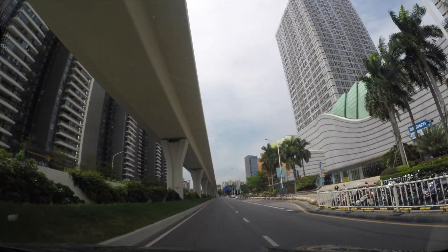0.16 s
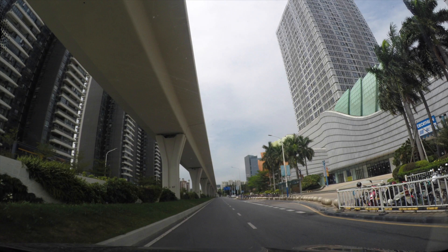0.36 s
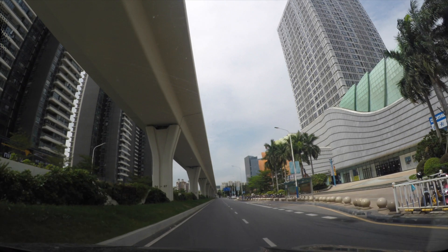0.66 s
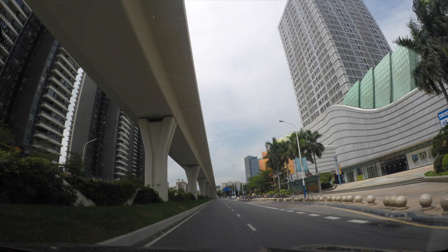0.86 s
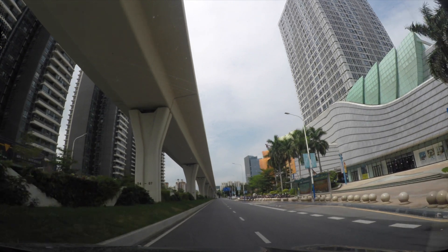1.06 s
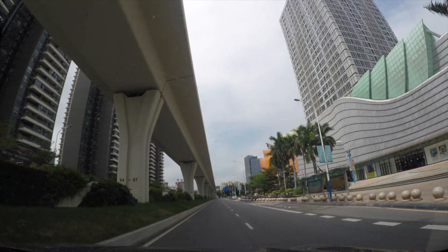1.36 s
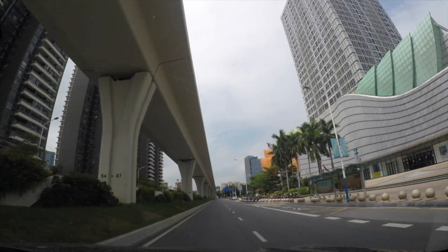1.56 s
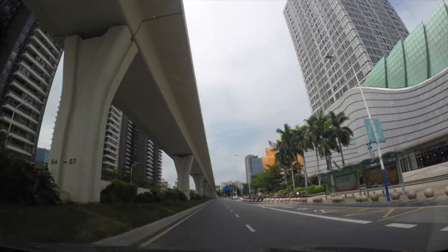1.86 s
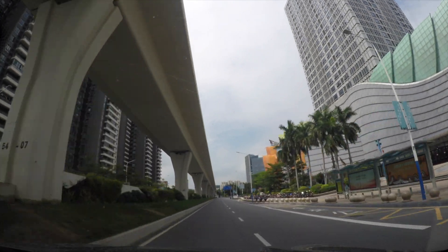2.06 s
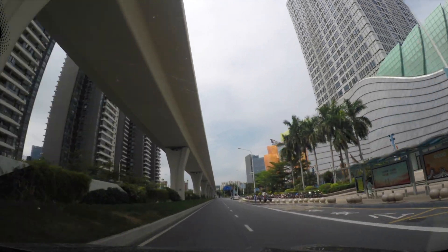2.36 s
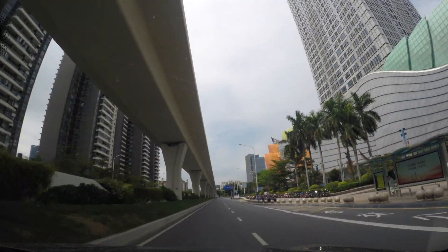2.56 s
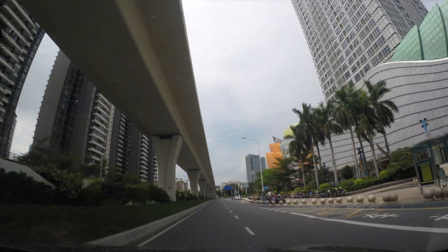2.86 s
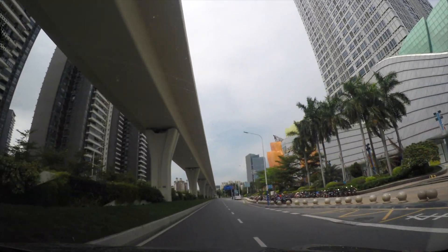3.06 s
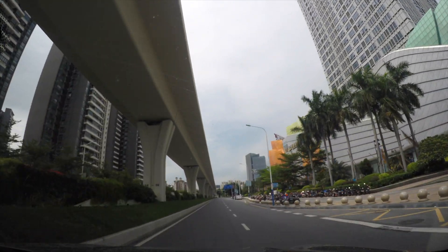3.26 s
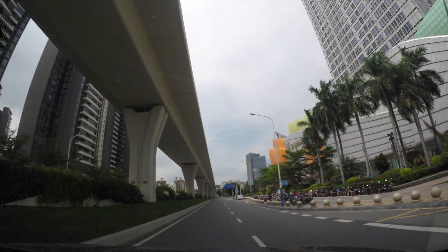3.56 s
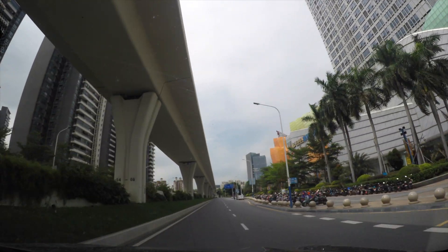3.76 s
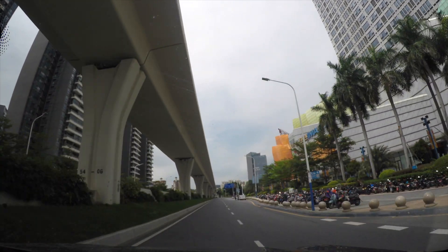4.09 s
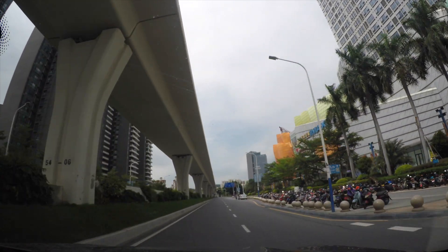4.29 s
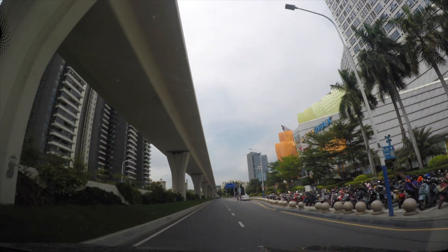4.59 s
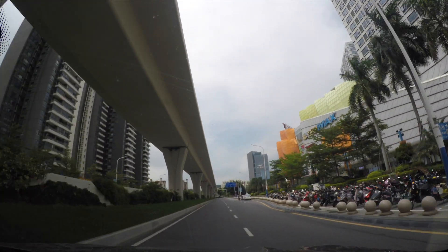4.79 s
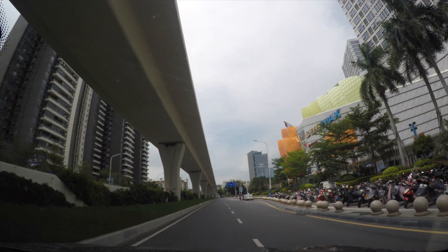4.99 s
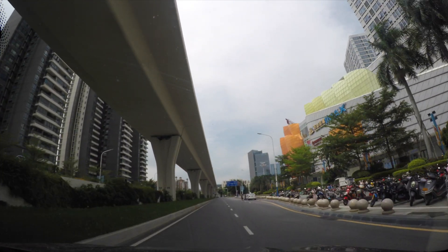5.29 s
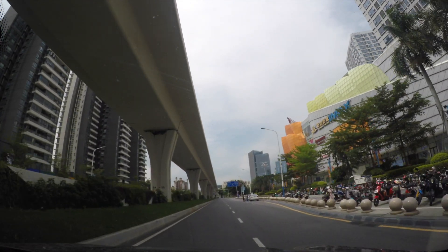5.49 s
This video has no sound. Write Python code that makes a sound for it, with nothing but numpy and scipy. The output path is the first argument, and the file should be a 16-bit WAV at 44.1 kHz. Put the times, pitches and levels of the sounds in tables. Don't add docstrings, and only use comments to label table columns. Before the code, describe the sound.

Steady bass-heavy car cabin drone on a city road, engine hum swelling and dropping in pitch after an upshift, bumps thudding softly underneath.

```python
import sys
import numpy as np
from scipy import signal
from scipy.io import wavfile
from scipy.ndimage import uniform_filter1d

SR = 44100
rng = np.random.default_rng(int(sys.argv[2]) if len(sys.argv) > 2 else 0)


def boost_factor(decibels):
    exponent = np.asarray(decibels, float) / 20
    return 10 ** exponent


def file_out(sig):
    cols = np.atleast_2d(sig).T
    lim = np.clip(cols, -1, 1)
    pcm = np.round(lim * 32767).astype(np.int16)
    wavfile.write(sys.argv[1], SR, pcm)


N = 248397

# time_s, firing_hz
ENGINE_SPEED = [
    [(0, 54), (.45, 60.24), (.8, 60.52), (1.35, 62.56), (2.1, 59)],
    [(2.25, 50.03), (2.66, 53.87), (2.9, 49.13), (3.4, 47.96), (4.15, 47.31), (4.5, 51.5), (4.87, 48.93),
     (5.63, 47.03)],
]
# start_s, press_s, held_s, firing_level_db, sag_db_per_s
THROTTLE_PRESSES = [
    (.33, .27, 1.18, -20.5, -0.7),
    (2.479, 0.4, 1.09, -16.5, -7.5),
    (4.18, 0.31, 0.8, -15.5, -6.5),
    (5.37, .25, .4, -17, 6),
]
# multiple_of_firing_rate, level_db (against the second order)
UPPER_ORDERS = [(3, -15), (4, -19)]
# time_s, level_db (against the average)
ROAD_COARSENESS = [
    (0, -0.5),
    (.4, -0.6),
    (.8, 0.5),
    (1.4, 0.5),
    (1.8, -0.46),
    (2.8, -0.4),
    (3.6, -0.84),
    (4.6, -0.5),
    (5.2, -.7),
    (5.63, -1),
]
# pitch_hz, level_db_per_hz
RUMBLE_COLOUR = [(7.1, -38.5), (12, -18), (32, -3.5), (53, -1), (69, -5.5), (87, -6.5), (129, -8.5),
                 (185, -12.5), (227, -15.5), (320, -31.5), (420, -59), (700, -120)]
# pitch_hz, level_db_per_hz
ROAR_COLOUR = [(140, -23), (240, -3.5), (266, -3.5), (442, -7), (495, -11), (813, -21), (1050, -26),
               (1550, -31), (1900, -34), (5000, -45.5), (6500, -71.5), (11000, -120)]
# pitch_hz, width_hz, lift_db
PANEL_MODES = [(81, 16, 6), (99, 9.3, 4.5), (122.2, 24, 6), (147, 12, -2), (198.1, 9, 7.5), (229, 16, 6),
               (245, 5, -3), (344.7, 44, 1), (445.4, 42, 5), (495, 2, -9), (542.6, 11, 7), (610, 18, 0),
               (839, 150, 5), (1300, 55, -1.5), (1411, 70, 3.5), (1560, 130, 4.5), (2256, 70, 4.5),
               (3600, 560, -0.5), (5420, 80, 4)]
# pitch_hz, level_db_per_hz
HISS_COLOUR = [(1800, -28), (3000, -5), (3600, -1.5), (4200, -12.5), (5400, -5), (8000, -9), (11300, -11.5),
               (13800, -14.5), (15500, -17)]
# pitch_hz, level_db
WHINE_TONES = [(11127, -97), (14692, -90)]
# time_s, boom_level_db, boom_pitch_hz, wheel_hop_level_db
ROAD_BUMPS = [(.13, -16.5, 35.5, -23), (.33, -27, 39.3, -29), (.5, -18.5, 36.3, -32),
              (.73, -15.5, 35.6, -39), (.97, -26, 37.5, -32), (1.18, -18, 37, -33), (1.42, -23, 36, -34),
              (1.62, -20.5, 37.9, -27.5), (1.95, -18, 38, -30), (2.14, -26, 42, -29.5),
              (2.35, -22.5, 42.3, -36), (2.62, -21, 37.8, -23.5), (2.91, -17.6, 37.4, -33),
              (3.2, -21, 37.9, -29), (3.42, -24.5, 36.6, -28.5), (3.85, -25.5, 38.5, -38),
              (4.01, -22, 38.2, -32.5), (4.2, -20.5, 38, -39), (4.5, -22.5, 38.4, -37),
              (4.71, -23, 36.8, -26.5), (5.12, -24, 35.8, -32), (5.36, -22, 38.8, -38),
              (5.6, -25, 38.5, -26.5)]
# start_s, peak_db, ring_hz, t60_s, snap_db (against the ring)
TRIM_TICKS = [
    (.341, -54, 3600, 0.011, -5),
    (.371, -64, 7270, 0.014, 0),
    (1.1589, -47.5, 2630, 0.011, -13),
    (1.161, -58, 6900, .01, -6),
    (1.914, -64, 6020, .01, -2),
    (2.107, -50, 4556, 0.013, -12),
    (2.108, -58, 6440, 0.016, -20),
]
# start_s, peak_db, ring_hz, t60_s, snap_db (against the ring)
HARD_PINGS = [
    (1.194, -65, 13950, .02, -23),
    (1.198, -61, 14020, 0.036, -15),
    (1.5374, -50.5, 13700, 0.011, -16),
    (1.54, -55.5, 14000, .08, -24),
]
# pitch_hz, step_db (against the usual level at 12 kHz)
SHORT_FRAME_STEPS = [(0, -40), (6000, -14), (9000, 1), (10500, 5.5), (12800, 7.5), (13000, 9.5),
                     (15000, 9.5)]
# pitch_hz, step_db (against the usual level at 12 kHz)
LONG_FRAME_STEPS = [(0, -40), (7000, -14), (10000, 2), (12800, 2.5), (13000, 3.5), (15000, 3.5)]
# pitch_hz, gain_db
CAMERA_BAND_EDGE = [(14900, 0), (15100, -8), (15500, -18), (15800, -60.5)]


def evened(x):
    return x / np.sqrt(np.mean(x ** 2) + 1e-20)


def curves(rows, t):
    s, *columns = np.transpose(rows)
    return [np.interp(t, s, column) for column in columns]


def drift(rate_hz):
    t = np.arange(0, N + 64, 64) / SR
    f = np.geomspace(rate_hz / 20, rate_hz, num=24)
    waves = np.sin(2 * np.pi * (f * t[:, None] + rng.random(len(f))))
    slow = (waves / np.sqrt(f)).sum(axis=1)
    return evened(np.interp(np.arange(N) / SR, t, slow))


def resonate(x, hz, width_hz):
    turn = np.exp(2j * np.pi * np.cumsum(hz * np.ones(len(x))) / SR)
    r = np.exp(-np.pi * width_hz / SR)
    return 2 * (turn * signal.lfilter([1 - r], [1, -r], x / turn)).real


def throttle(t, hz):
    lift_s, coast_db, coast_second_db = .28, -31, -48
    first = boost_factor(coast_db) + 0 * t
    for s, press_s, held_s, db, sag in THROTTLE_PRESSES:
        pressing = (t - s) / press_s
        lifting = 1 - (t - s - held_s) / lift_s
        load = np.clip(np.minimum(pressing, lifting), 0, 1) ** 2
        first = first + load * boost_factor(db + sag * (t - s - held_s / 2))
    second_db = -23 + 0.57 * (hz - 51)
    return first, boost_factor(coast_second_db) + first * boost_factor(second_db)


def engine():
    out = np.zeros(N)
    uneven = boost_factor(.6 * drift(14.))
    for rows in ENGINE_SPEED:
        span = slice(round(rows[0][0] * SR), min(round(rows[-1][0] * SR), N))
        t = np.arange(N)[span] / SR
        hz = curves(rows, t)[0]
        angle = 2 * np.pi * np.cumsum(hz) / SR
        first, second = throttle(t, hz)
        upper = np.sin(2 * angle + 1) + sum(boost_factor(db) * np.sin(k * angle) for k, db in UPPER_ORDERS)
        hum = first * np.sin(angle) + second * upper
        out[span] += np.sqrt(2) * hum * uneven[span] * signal.windows.tukey(len(t), .06)
    return out


def noise(spectrum, size, patchy_db, flicker_db, panels=()):
    hz = np.fft.rfftfreq(size, 1 / SR)
    re, im, patches = rng.standard_normal((4 * N // size + 5, len(hz), 3)).T
    patches = uniform_filter1d(patches, size=12, axis=0)
    patches = evened(uniform_filter1d(patches, size=9, axis=1))
    f, db = np.transpose(spectrum)
    colour_db = np.interp(np.log(hz + 1), np.log(f + 1), db, left=-120, right=-150)
    for mid, width, lift in panels:
        colour_db = colour_db + lift / (1 + (2 * (hz - mid) / width) ** 2)
    flicker = flicker_db * rng.standard_normal(re.shape[1])
    level_db = colour_db[:, None] + patchy_db * patches + flicker
    frames = (re + 1j * im) * boost_factor(level_db)
    return evened(signal.istft(frames, nperseg=size, noverlap=size * 3 // 4)[1][:N])


def road():
    coarse_db = curves(ROAD_COARSENESS, np.arange(N) / SR)[0]
    rumble_db = -35.5 + 1.8 * coarse_db
    roar_db = -42 + coarse_db
    hiss_db = -68 + 1.2 * (roar_db - roar_db.mean())
    rumble = noise(RUMBLE_COLOUR, size=8192, patchy_db=-1.8, flicker_db=0.9, panels=PANEL_MODES)
    roar = noise(ROAR_COLOUR, size=4096, patchy_db=-0.1, flicker_db=-0.95, panels=PANEL_MODES)
    rumble = boost_factor(rumble_db + 7.5) * rumble
    roar = boost_factor(roar_db + 3.0) * roar
    roar = roar + (boost_factor(0.04 + .9 * coarse_db) - 1) * resonate(roar, 400.0, 260.)
    grit = boost_factor(.45 * drift(520.))
    hiss = boost_factor(hiss_db) * noise(HISS_COLOUR, size=512, patchy_db=0.9, flicker_db=0.26)
    return rumble + grit * (roar + hiss)


def electronics():
    t = np.arange(N) / SR
    return sum(boost_factor(db) * np.sin(2 * np.pi * hz * t) for hz, db in WHINE_TONES)


def jolts(levels_db, swell_s, rest_db):
    t = np.arange(N) / SR
    power = boost_factor(rest_db) ** 2
    for row, db in zip(ROAD_BUMPS, levels_db):
        power = power + boost_factor(db) ** 2 * np.exp(-((t - row[0]) / swell_s) ** 2 / 2)
    return 10 * np.log10(power)


def ringing(hz, level_db, wobble, width_hz, kicks_db):
    angle = 2 * np.pi * np.cumsum(hz) / SR
    ring = np.sqrt(2) * np.sin(angle + wobble * drift(3.))
    kicks = resonate(rng.standard_normal(N), hz, width_hz)
    kicks = evened(resonate(kicks, hz, width_hz))
    return boost_factor(level_db) * (ring + boost_factor(kicks_db) * kicks)


def boom():
    s, db, hz, _ = np.transpose(ROAD_BUMPS)
    pitch_hz = np.interp(np.arange(N) / SR, s, hz)
    level_db = jolts(db, swell_s=.066, rest_db=-36)
    return ringing(pitch_hz, level_db, wobble=.2, width_hz=24., kicks_db=-6.)


def wheels():
    hz = 20.2 + .8 * np.sin(2 * np.pi * 1.9 * np.arange(N) / SR)
    level_db = jolts(np.transpose(ROAD_BUMPS)[3], swell_s=.065, rest_db=-40)
    return boost_factor(1.5) * ringing(hz, level_db, wobble=.4, width_hz=26., kicks_db=-1.)


def trim():
    out, t = np.zeros(N + 4000), np.arange(4000) / SR
    onset = np.minimum(t / 0.00035, 1)
    for s, db, hz, t60, snap_db in TRIM_TICKS + HARD_PINGS:
        snap = signal.lfilter([1, 0, -1], [1, -.6], rng.standard_normal(len(t)))
        snap = snap * boost_factor(snap_db - 60 * t / 0.034)
        ring = np.sin(2 * np.pi * hz * t) * boost_factor(-60 * t / max(t60, .003))
        out[round(s * SR):][:len(t)] += boost_factor(db) * (ring + snap) * onset
    return out[:N]


def scene():
    return (engine() + road() + electronics() + boom() + wheels() + trim())[None]


def rounded(x, size, steps):
    hz, t, z = signal.stft(x, SR, window="cosine", nperseg=size)
    usual = np.median(abs(z[0, np.searchsorted(hz, 12000)]))
    wander_db = 1.5 * np.interp(t, np.arange(N) / SR, drift(160.))
    step_db = np.interp(hz, *np.transpose(steps))[:, None] + wander_db
    step = usual * boost_factor(step_db)
    edge = boost_factor(np.interp(hz, *np.transpose(CAMERA_BAND_EDGE)))[:, None]
    size_kept = np.floor(abs(z) / step + .4) * step
    kept = size_kept * np.exp(1j * np.angle(z)) * edge
    return signal.istft(kept, SR, window="cosine", nperseg=size)[1][:, :N]


def camera(x):
    mood = evened(uniform_filter1d(rng.standard_normal(N // 940 + 1), size=2))
    short = np.repeat(mood < np.quantile(mood, .8), 940)[:N]
    short = uniform_filter1d(short * 1., size=128)
    treble = signal.butter(6, [11000, 15700], "band", fs=SR, output="sos")
    seams = signal.sosfilt(treble, x * (np.arange(N) % 118 == 0))
    coarse = rounded(x, size=256, steps=SHORT_FRAME_STEPS) + boost_factor(-51) * seams
    return short * coarse + (1 - short) * rounded(x, size=2048, steps=LONG_FRAME_STEPS)


def low_pass(x):
    return signal.sosfilt(signal.butter(12, 15710, fs=SR, output="sos"), x)


def record(dry):
    mix = camera(dry)
    return low_pass(mix)


dry = scene()
out = record(dry)
file_out(out)
```